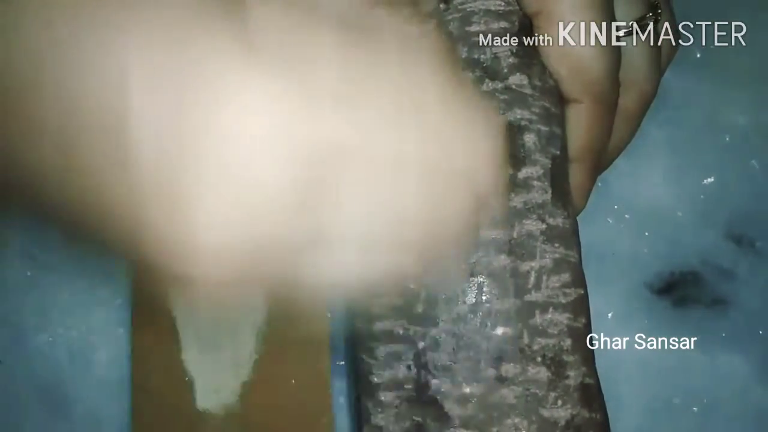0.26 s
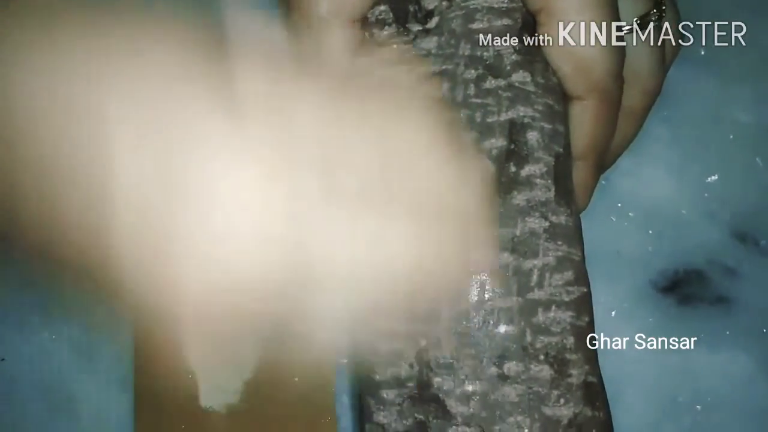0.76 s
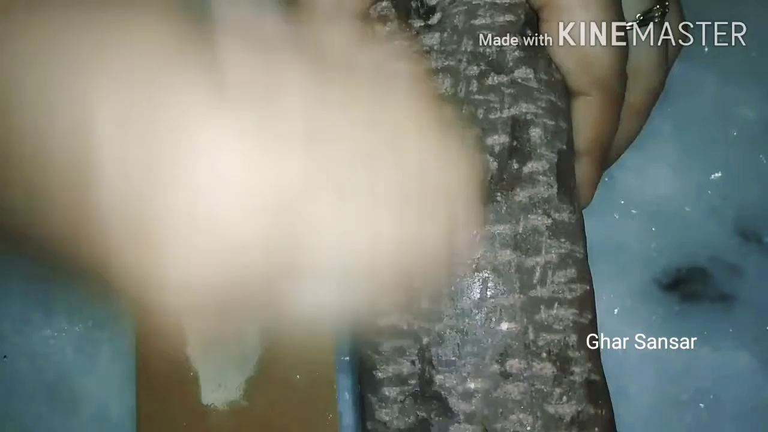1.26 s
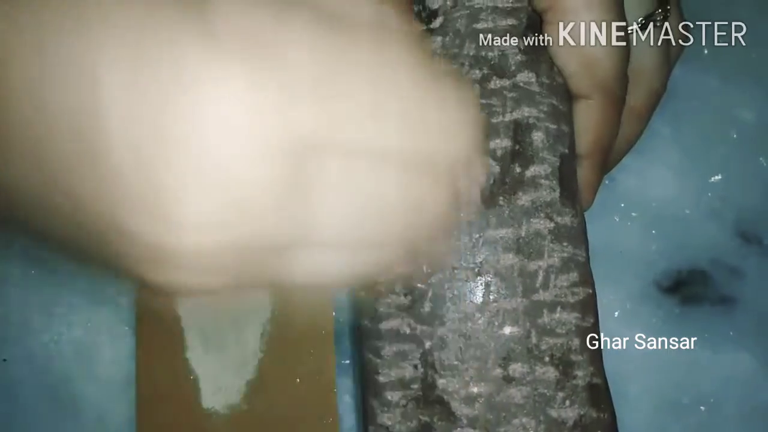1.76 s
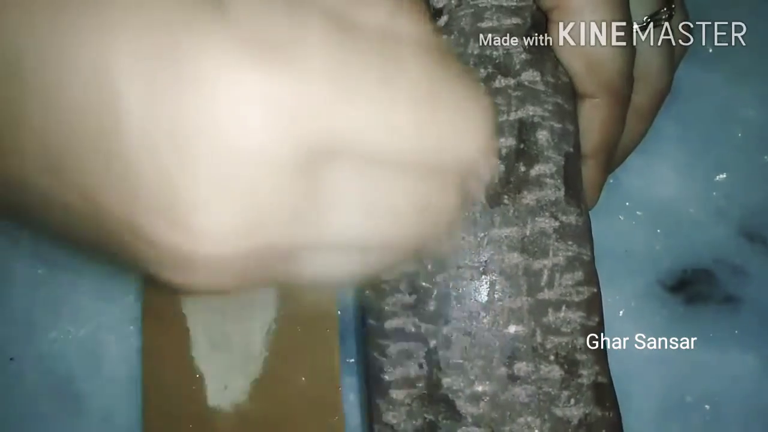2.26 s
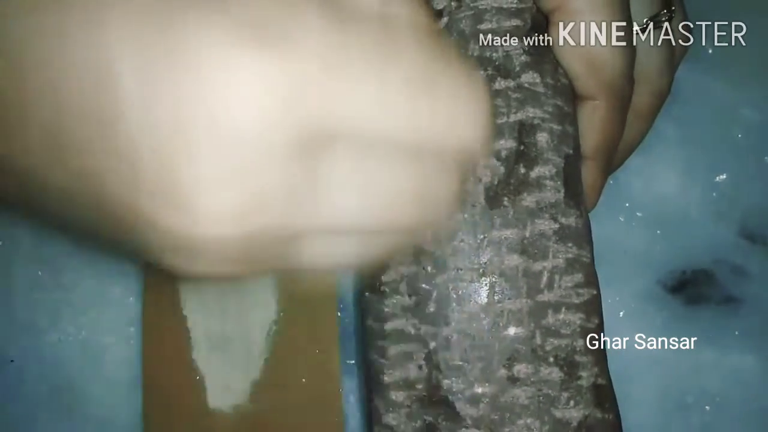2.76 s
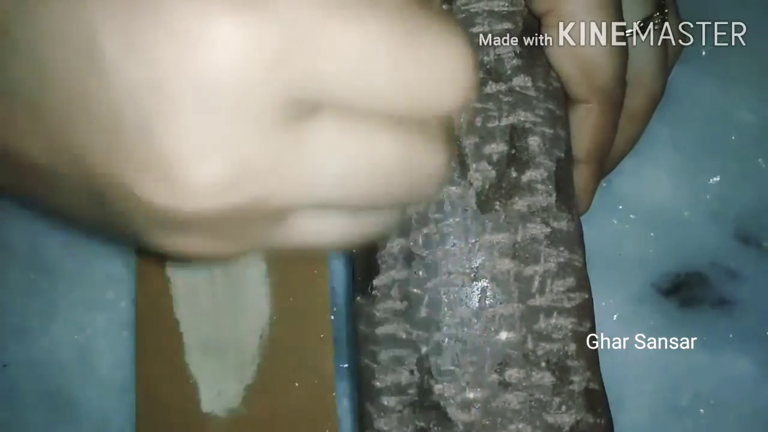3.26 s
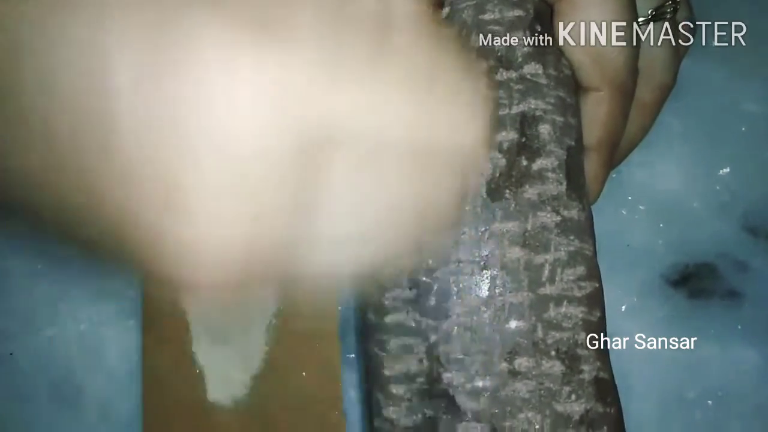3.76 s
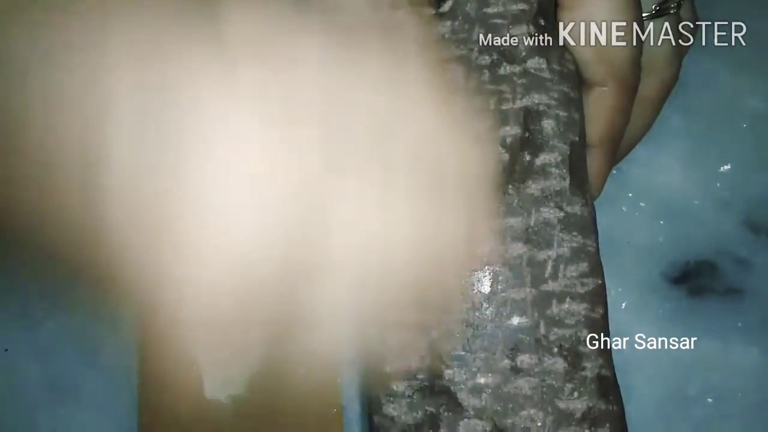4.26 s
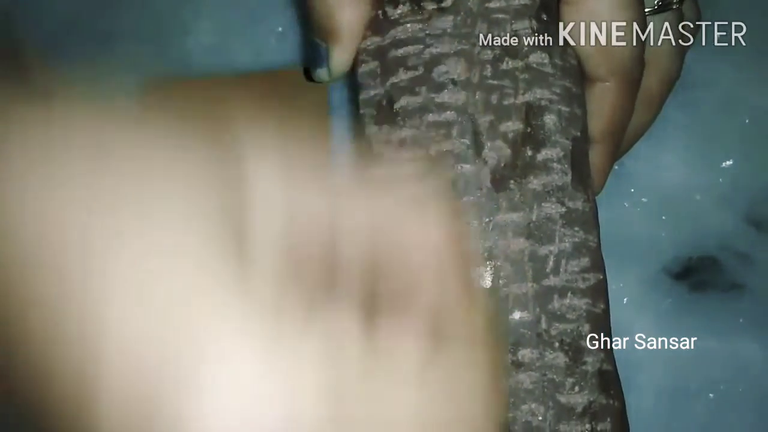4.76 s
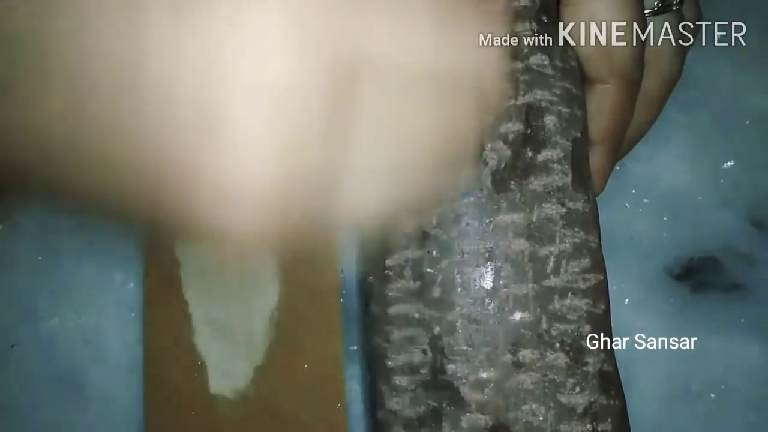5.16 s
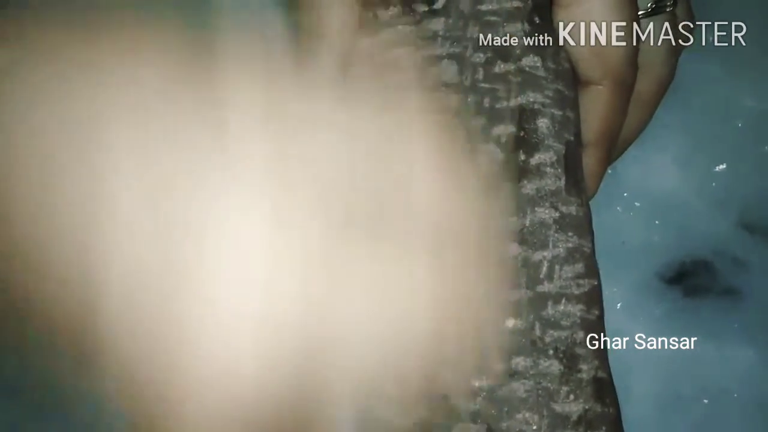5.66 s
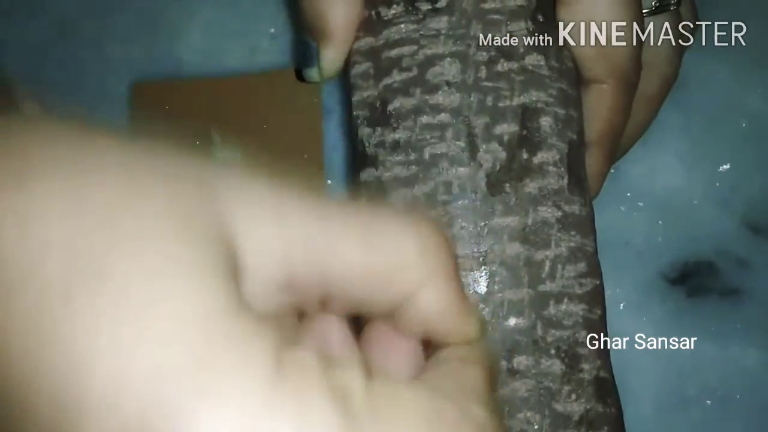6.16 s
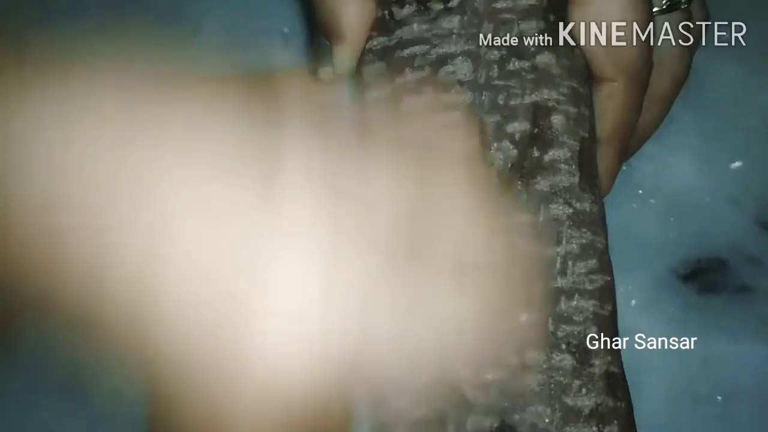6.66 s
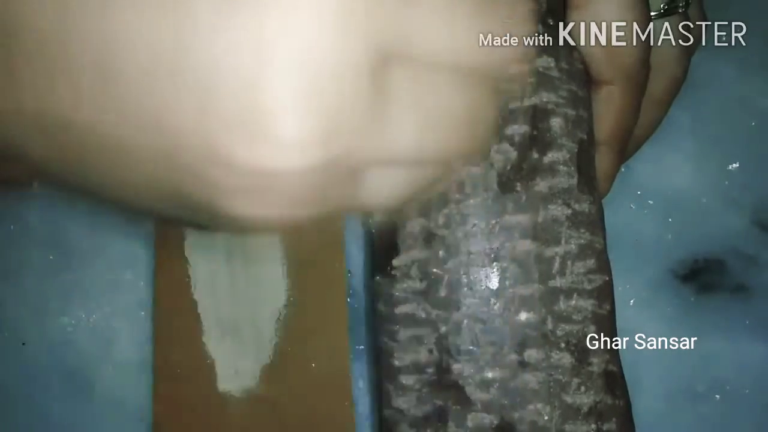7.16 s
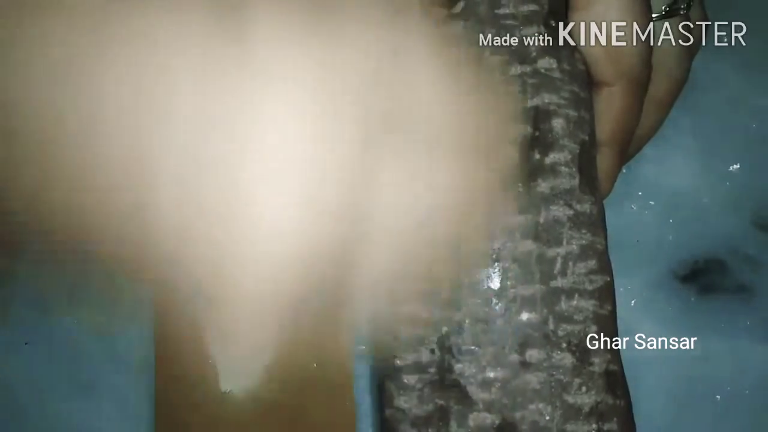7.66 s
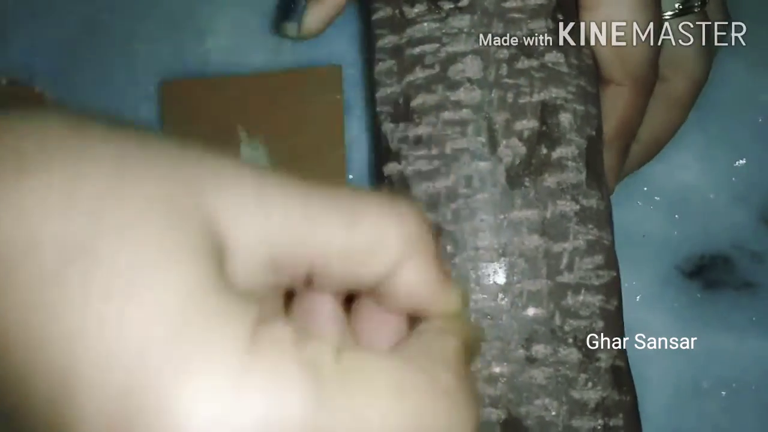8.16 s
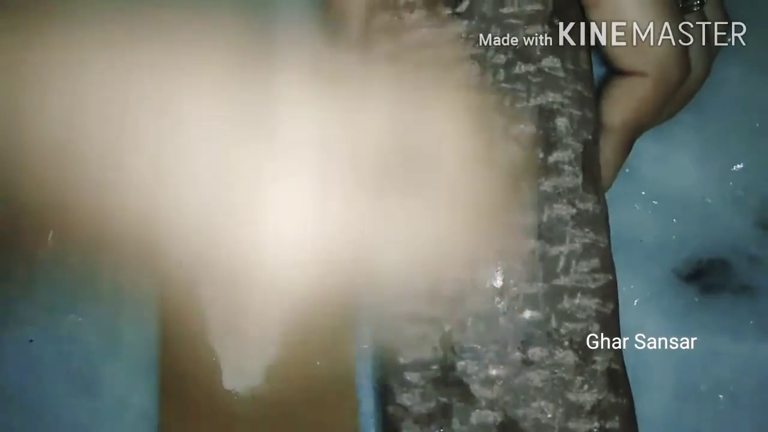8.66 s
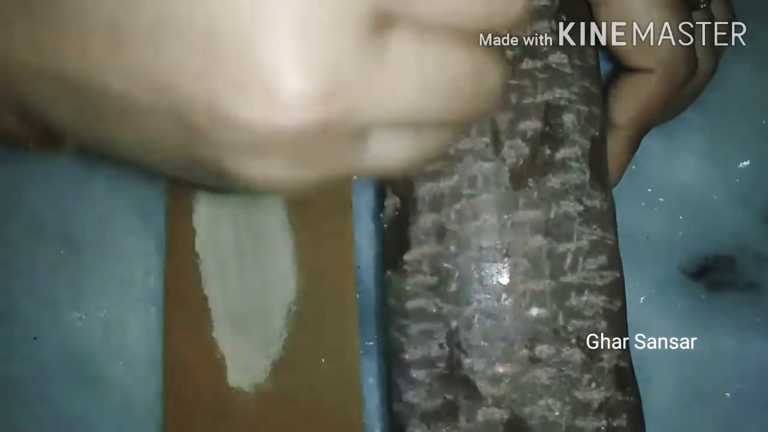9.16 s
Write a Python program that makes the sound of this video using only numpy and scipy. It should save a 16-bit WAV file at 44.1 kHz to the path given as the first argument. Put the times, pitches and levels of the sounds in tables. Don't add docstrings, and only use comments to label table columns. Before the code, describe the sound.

From 0 s a hard seed is already being rubbed quickly back and forth on a rough, pitted grinding stone, very close to the microphone. Pull and push alternate, about four full cycles a second; each stroke is a tiny burst of gritty hiss that swells in the middle and nearly stops at the turn. Several sharp, dry clicks from ridges crowd into each stroke, with small pits crackling between. Pushes snap louder and brighter; pulls are softer and scratchier. The tone is hard and stony, mostly upper-mid, with little bass. Very faint dull thuds of the table hide around 3.7 and 3.8 s. After about 4.9 s the strokes are slightly quicker, reaching around nine a second, with small uneven changes in pressure. Another low thud, a bit stronger, comes near 8.7 s. The rubbing continues to the end, past 9 s, in a small dry room with a short tail and faint low murmur.

```python
import sys
import numpy as np
from scipy import signal
from scipy.fft import rfft, irfft
from scipy.io import wavfile
from scipy.ndimage import uniform_filter1d, minimum_filter1d

SR = 44100
rng = np.random.default_rng(int(sys.argv[2]) if len(sys.argv) > 2 else 0)


def waveform_to_disk(signal):
    frames = np.transpose(np.atleast_2d(signal))
    scaled = np.clip(frames, -1, 1) * 32767
    samples = np.round(scaled).astype(np.int16)
    wavfile.write(sys.argv[1], SR, samples)


def makeup_ratio(level_db):
    decades = np.asarray(level_db, float) / 20
    return 10 ** decades


N = 414540

# t/s, pressure level/dB
HAND = [(-0.001, -23.5), (0.754, -25.5), (1.495, -24.0), (2.227, -23), (2.977, -24.0), (3.69, -23.5),
        (4.396, -24.5), (5.093, -23), (5.789, -21), (6.465, -22), (7.125, -24.0), (7.792, -22),
        (8.442, -24.0), (9.116, -20), (9.779, -21.5)]
# first t/s, hardest t/s, last t/s, first peak level/dB, hardest peak level/dB
SLOW_PULLS = [(0.0391, 0.0638, 0.088, -10, -6), (0.2769, 0.3292, 0.3292, -10, -4),
              (0.531, 0.5801, 0.5801, -12, -5), (0.8084, 0.8084, 0.8371, -5, -5),
              (1.0283, 1.0447, 1.0902, -14, -3), (1.2831, 1.3023, 1.3222, -9, -6),
              (1.5208, 1.563, 1.5781, -8, -6), (1.7581, 1.83, 1.841, -14, -2),
              (2.0099, 2.0599, 2.0754, -11, -8), (2.2595, 2.301, 2.3096, -6, -4),
              (2.5054, 2.5382, 2.5938, -12, -2), (2.7651, 2.7885, 2.7963, -10, -3),
              (3.003, 3.0152, 3.054, -14, -6), (3.2621, 3.2621, 3.3134, -3, -3),
              (3.4895, 3.496, 3.5236, -10, -6), (3.7068, 3.7386, 3.7652, -14, -1),
              (3.9714, 3.9714, 3.9989, -3, -3), (4.1841, 4.208, 4.2578, -11, -3),
              (4.4352, 4.4554, 4.4665, -11, -6), (4.6517, 4.6593, 4.7003, -3, -2)]
SLOW_PUSHES = [(0.1486, 0.197, 0.2192, -6, -1), (0.3893, 0.4068, 0.4718, -13, -5),
               (0.6514, 0.6811, 0.7161, -5, 0), (0.9269, 0.9366, 0.9836, -9, 0),
               (1.1743, 1.1845, 1.198, -2, 0), (1.4033, 1.4529, 1.4608, -10, 0),
               (1.6295, 1.6651, 1.7008, -6, 0), (1.8692, 1.929, 1.9568, -13, 0),
               (2.1395, 2.1903, 2.1903, -9, 0), (2.4002, 2.4249, 2.4473, -4, 0),
               (2.6193, 2.6822, 2.7122, -14, 0), (2.8695, 2.91, 2.9374, -11, 0),
               (3.1202, 3.1576, 3.2008, -13, 0), (3.3572, 3.3738, 3.4156, -6, 0),
               (3.6115, 3.6185, 3.6774, -2, 0), (3.8304, 3.8681, 3.8948, -13, 0),
               (4.0682, 4.1111, 4.1368, -9, 0), (4.3015, 4.3497, 4.37, -10, -1),
               (4.5439, 4.5439, 4.6134, 0, 0), (4.7785, 4.8071, 4.8419, -12, 0)]
QUICK_PULLS = [(4.8746, 4.9214, 4.9389, -9, -3), (5.1257, 5.1257, 5.1852, -7, -7),
               (5.3727, 5.3862, 5.3928, -13, -4), (5.6019, 5.6222, 5.6289, -11, -6),
               (5.8118, 5.8299, 5.8409, -8, -7), (6.055, 6.0732, 6.0796, -8, -5),
               (6.2869, 6.3115, 6.3115, -8, -7), (6.4924, 6.5253, 6.5293, -14, -10),
               (6.7048, 6.7215, 6.7278, -6, -5), (6.9235, 6.9588, 6.9809, -8, -5),
               (7.166, 7.1781, 7.2083, -13, -7), (7.3959, 7.3959, 7.4323, -5, -5),
               (7.5945, 7.6286, 7.646, -14, -3), (7.8244, 7.8596, 7.8751, -11, -3),
               (8.0413, 8.0541, 8.1023, -12, -4), (8.2589, 8.291, 8.3102, -13, -11),
               (8.471, 8.4866, 8.5344, -14, -7), (8.6798, 8.7198, 8.7509, -12, -5),
               (8.9276, 8.9614, 8.9793, -7, -9), (9.1509, 9.1509, 9.1986, -3, -3),
               (9.3637, 9.3777, 9.3946, -8, -7)]
QUICK_PUSHES = [(5.0268, 5.0268, 5.0501, 0, 0), (5.2437, 5.2634, 5.3022, 0, 0),
                (5.4599, 5.5059, 5.5501, -6, 0), (5.7154, 5.7303, 5.7628, -10, 0),
                (5.9227, 5.9583, 5.9859, -14, 0), (6.1439, 6.1757, 6.208, -12, -4),
                (6.3749, 6.4109, 6.4434, -8, 0), (6.612, 6.6241, 6.6737, -1, 0),
                (6.8271, 6.8514, 6.8819, -4, 0), (7.0289, 7.0772, 7.1064, -11, 0),
                (7.2626, 7.291, 7.3342, -10, 0), (7.4721, 7.4954, 7.5567, -7, 0),
                (7.7035, 7.7253, 7.7603, -9, 0), (7.9137, 7.9346, 7.9648, -10, 0),
                (8.1307, 8.1594, 8.1827, -10, -1), (8.3508, 8.3722, 8.4071, -10, 0),
                (8.5802, 8.5885, 8.6467, -4, 0), (8.8011, 8.8281, 8.8648, -1, 0),
                (9.0285, 9.0426, 9.0916, -6, 0), (9.2468, 9.2532, 9.3069, -2, 0)]
# f/Hz, width/Hz, near-end level/dB, far-end level/dB, extra level when pushing/dB
SEED_MODES = [(896, 1800, -36, -29.5, 9), (2510, 513, -10.5, -23, 11), (2758, 374, -26.5, 9, -4.5),
              (3860, 570, -30, -39, 12.5), (4734, 800, 4.5, -5, 4), (8030, 740, -15, -37.5, 0),
              (10800, 4500, -70, -35, 4)]
# f/Hz, width/Hz, near-end level/dB, far-end level/dB, extra level when pushing/dB
STONE_MODES = [(150, 370, -29.5, -18.5, -2.5), (343.4, 63, -14.5, -15.5, -7.5), (552, 92, -23.5, -26, -1.5),
               (990, 350, -29.5, -27.5, 6), (1735, 167, -32, -20, 10), (2196, 260, -15.5, -17, 8.5),
               (2626, 480, -5, -8.5, -3.5), (3015, 483, -11, 1, -13.5), (3120, 163, -6.5, -21, 2),
               (3810, 310, -7, -15, 4), (4401, 310, -2.5, -15, 6), (4521, 226, -1, -6, 6),
               (5290, 770, -13, -11.5, 3), (5604, 244, -11, -9, 7), (5650, 400, -14.5, -21.5, 4),
               (7480, 860, -30.5, -31.5, 3), (9850, 540, -26.5, -36, 3.5), (12700, 12000, -49, -50, -8)]
# t/s, level/dB, f/Hz
BUMPS = [
    (3.68, -43, 70),
    (3.8, -43, 65),
    (8.653, -40, 85),
]
# f/Hz, spectral level/dB
AIR_SPECTRUM = [(25, -28), (45, -9), (65, -6), (100, -1), (200, -5), (365, -1), (420, -6.5), (560, -1),
                (640, -13), (1400, -12.5), (3000, -5.5), (15000, -47)]

CYCLES_PER_ROW = 3
PULL_SHARE, PUSH_DB, PRESS_SCATTER_DB = .48, 1.5, 1.82
GRIT_POWER, GRIT_REST = 1.365, 0.023
PITS_PER_S, PIT_DB, PIT_SPREAD_DB = 300, 6, 4.5
RIDGE_GAP, RIDGE_JITTER, RIDGE_MISSED = .084, .14, .18
RIDGE_DROP_DB, LAST_DROP_DB, CLOSEST_S = 11, 8, .004
KNOCK_DB, DUST_DB, DUST_S = 5.5, -25, .003
THROUGH_DB = -11
HISS_DB, SKIRT = -4, 3.14
ROOM_T60_S, ROOM_DB, ROOM_TOP_HZ = 0.14, -23.5, 5600
AIR_DB = -48
PORT_DIP_HZ, PORT_DIP_WIDTH_HZ = 4248, 69
PORT_PEAK_HZ, PORT_PEAK_WIDTH_HZ = 4320.6, 92
MIC_TOP_HZ, MIC_HISS_DB, TOP_HZ = 11700, -76, 15500
LIMIT, LIMIT_S = .97, .0004


def rubbing():
    speed, place, push, press_db = hand()
    hiss, pits = grit(speed, press_db)
    blows = knocks(place) + pits
    dust_decay = np.exp(-1 / (DUST_S * SR))
    dust = signal.lfilter([1], [1, -dust_decay], blows) * rng.standard_normal(N)
    snap = uniform_filter1d(blows, size=3)
    seed = body(SEED_MODES, 0, snap, place, push, flip=1, waver_db=.9)
    rasp = hiss + makeup_ratio(DUST_DB) * dust
    stone = body(STONE_MODES, rasp, makeup_ratio(THROUGH_DB) * blows, place, push, flip=-1.0152, waver_db=1.29)
    return seed + stone


def hand():
    t = np.arange(N) / SR
    start, db = np.transpose(HAND)
    cycle = np.maximum(np.interp(t, start, CYCLES_PER_ROW * np.arange(len(start))), 0)
    turn = np.interp(cycle % 1, [0, PULL_SHARE, 1], [0, 1, 2])
    speed = np.abs(np.sin(np.pi * turn))
    place = .5 - .5 * np.cos(np.pi * turn)
    push = uniform_filter1d(np.floor(turn), size=400)
    press_db = np.interp(t, start, db) + PUSH_DB * push + PRESS_SCATTER_DB * walk(6.9)
    return speed, place, push, press_db


def grit(speed, press_db):
    force = makeup_ratio(press_db) * (GRIT_REST + speed ** GRIT_POWER)
    patchy_db = 3.0 * walk(300) + .6 * walk(30)
    hiss = force * rng.standard_normal(N) * makeup_ratio(HISS_DB + patchy_db)
    hit = rng.random(N) < PITS_PER_S * speed / SR
    size = np.minimum(rng.exponential(size=N), 2.5)
    pits = force * hit * makeup_ratio(PIT_DB + PIT_SPREAD_DB * size)
    return hiss, pits


def knocks(place):
    t = np.arange(N) / SR
    travel = np.cumsum(np.abs(np.gradient(place)))
    strokes = np.concatenate([SLOW_PULLS, SLOW_PUSHES, QUICK_PULLS, QUICK_PUSHES])
    first, hardest, last, first_db, top_db = np.transpose(strokes)[..., None]
    step = np.arange(-12, 13)
    shift, low, luck = np.moveaxis(rng.random((len(first), len(step), 3)), -1, 0)
    offset = RIDGE_GAP * (step + RIDGE_JITTER * (2 * shift - 1))
    when_met = np.interp(np.interp(hardest, t, travel) + offset, travel, t)
    within = (when_met > first + CLOSEST_S) & (when_met < last - CLOSEST_S)
    struck = within & (luck > RIDGE_MISSED) & (step != 0)
    ridge_db = top_db - RIDGE_DROP_DB * low
    blow = np.zeros(N)
    for when, db in ((when_met[struck], ridge_db[struck]), (last, top_db - LAST_DROP_DB),
                     (first, first_db), (hardest, top_db)):
        blow[(when * SR).astype(int)] = makeup_ratio(db + KNOCK_DB)
    return blow


def body(modes, hiss, blows, place, push, flip, waver_db):
    hz, width, near_db, far_db, push_db = np.transpose(modes)[..., None]
    gain = makeup_ratio(near_db + (far_db - near_db) * place + push_db * push)
    hiss_norm = np.sqrt(np.sum(gain ** 2 * width, axis=0) * np.pi / SR)
    blow_norm = np.sqrt(np.sum((gain * width) ** 2, axis=0)) * 2 * np.pi / SR
    drive = hiss / hiss_norm + blows / blow_norm
    out = np.zeros(N)
    for k in range(len(modes)):
        force = gain[k] * makeup_ratio(waver_db * walk(60)) * drive
        out += flip ** k * ring(force, hz[k, 0], width[k, 0])
    return out


def ring(x, hz, width):
    for spread in (1, SKIRT):
        q = max(hz / (spread * width), .7)
        x = signal.lfilter(*signal.iirpeak(hz, q, fs=SR), x)
    return x


def walk(rate):
    k = int(SR / rate)
    held = np.repeat(rng.standard_normal(N // k + 1), k)
    return 1.79 * uniform_filter1d(held, k)[:N]


def room(x):
    t = np.arange(SR // 3) / SR
    tail = rng.standard_normal(len(t)) * makeup_ratio(-60 * t / ROOM_T60_S) * (t > .003)
    tail = signal.lfilter(*signal.butter(2, ROOM_TOP_HZ, fs=SR), tail)
    tail = tail / np.sqrt(np.sum(tail ** 2))
    return makeup_ratio(ROOM_DB) * signal.fftconvolve(x, tail)[:N]


def bumps():
    out = 0
    for s, db, hz in BUMPS:
        t = np.maximum(np.arange(N) / SR - s, 0)
        swell = np.e * t / 0.013 * np.exp(-t / 0.012)
        out = out + makeup_ratio(db) * swell * np.sin(2 * np.pi * hz * t)
    return out


def air():
    hz, db = np.transpose(AIR_SPECTRUM)
    f = np.maximum(np.arange(N // 2 + 1) * SR / N, 1)
    shape = makeup_ratio(np.interp(np.log(f), np.log(hz), db))
    x = irfft(rfft(rng.standard_normal(N)) * shape, N)
    return x / np.std(x) * makeup_ratio(AIR_DB + .8 * walk(3))


def scene():
    rub = rubbing()
    return (rub + room(rub) + bumps() + air())[None]


def resonant_pair(hz, width):
    radius = np.exp(-np.pi * width / SR)
    return [1, -2 * radius * np.cos(2 * np.pi * hz / SR), radius ** 2]


def port(x):
    dip = resonant_pair(PORT_DIP_HZ, PORT_DIP_WIDTH_HZ)
    peak = resonant_pair(PORT_PEAK_HZ, PORT_PEAK_WIDTH_HZ)
    return signal.lfilter(dip, peak, x)


def band_limit(x):
    return signal.sosfilt(signal.butter(12, 15970, fs=SR, output="sos"), x)


def record(dry):
    heard = signal.lfilter(*signal.butter(2, MIC_TOP_HZ, fs=SR), port(dry))
    span = int(LIMIT_S * SR)
    duck = minimum_filter1d(LIMIT / np.maximum(np.abs(heard), LIMIT), size=2 * span + 1)
    smooth_duck = uniform_filter1d(uniform_filter1d(duck, size=span), size=span)
    hissing = heard * smooth_duck + makeup_ratio(MIC_HISS_DB) * rng.standard_normal(N)
    top_filter = signal.ellip(8, .2, 50, TOP_HZ, fs=SR, output="sos")
    mix = signal.sosfilt(top_filter, hissing)
    return band_limit(mix)


dry = scene()
out = record(dry)
waveform_to_disk(out)
```